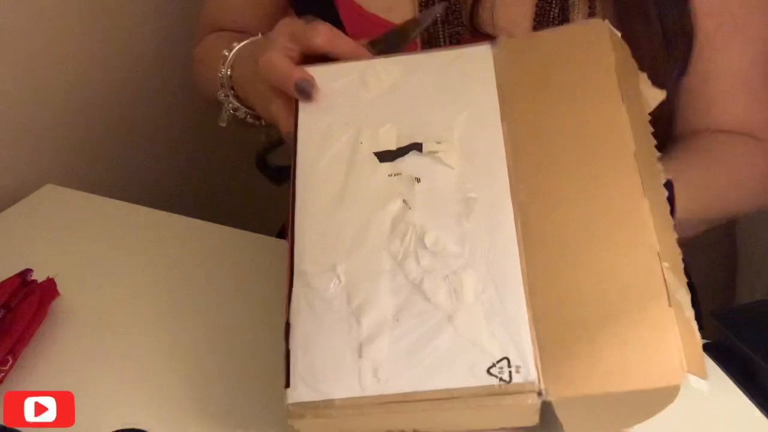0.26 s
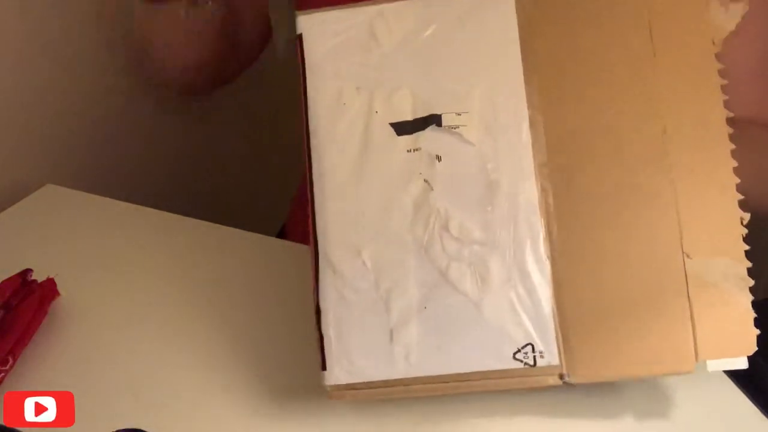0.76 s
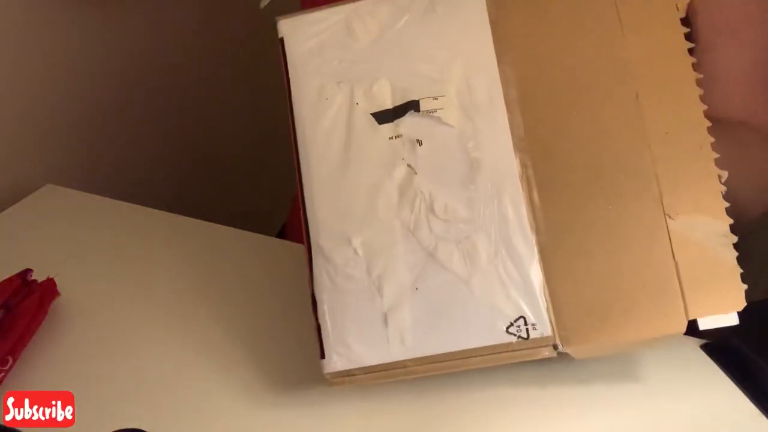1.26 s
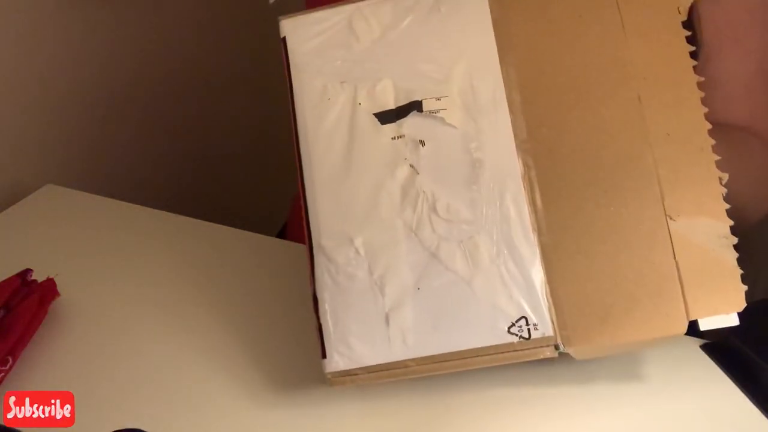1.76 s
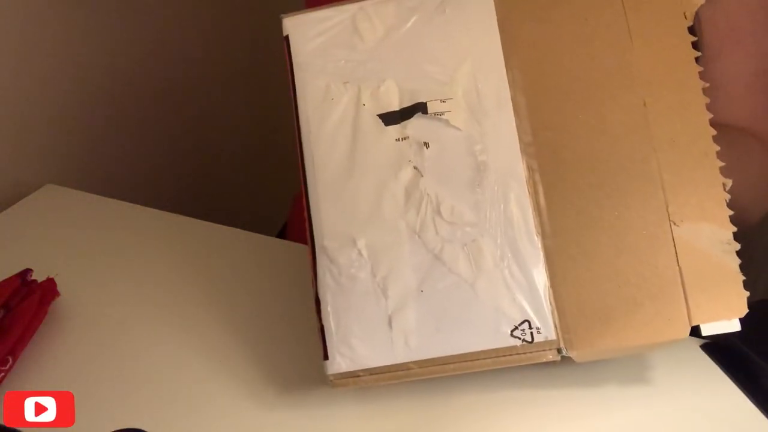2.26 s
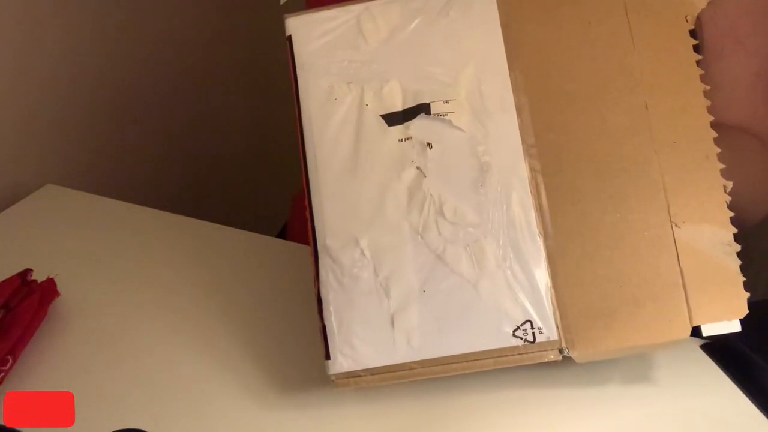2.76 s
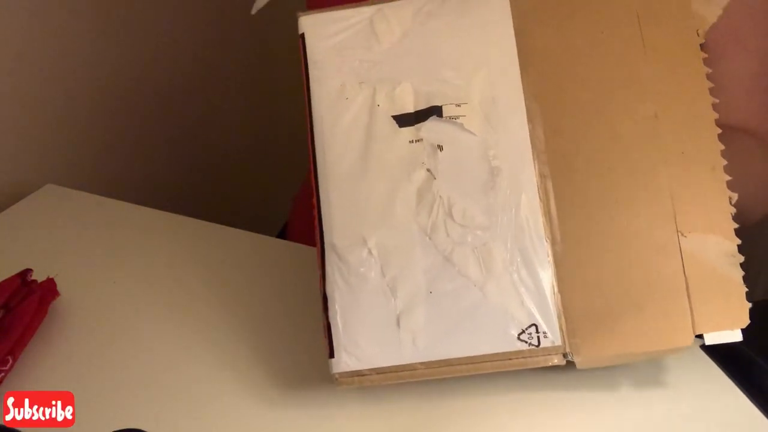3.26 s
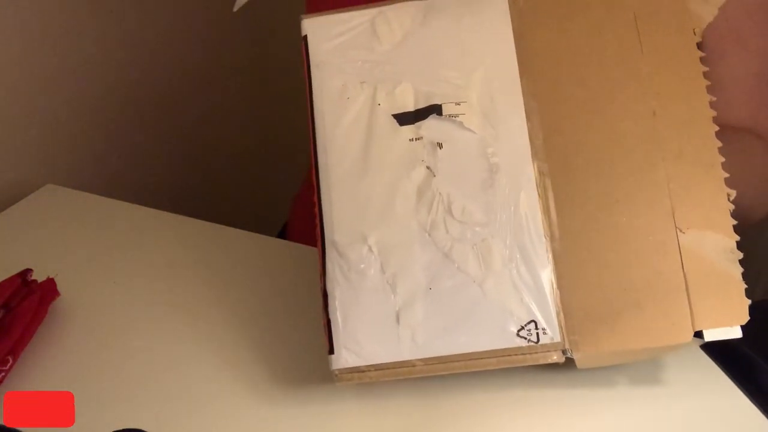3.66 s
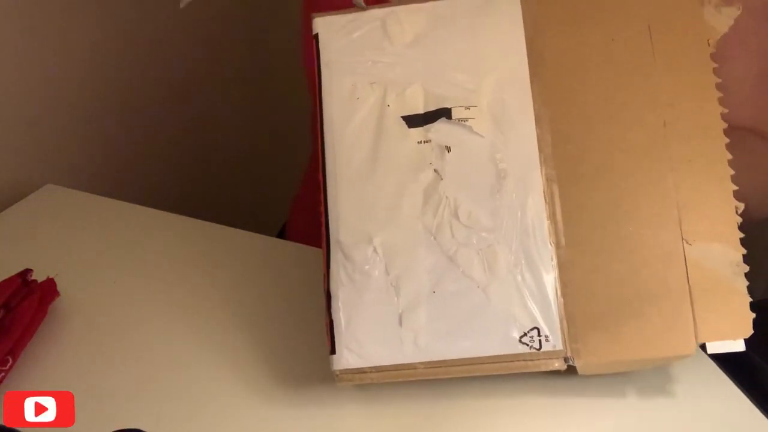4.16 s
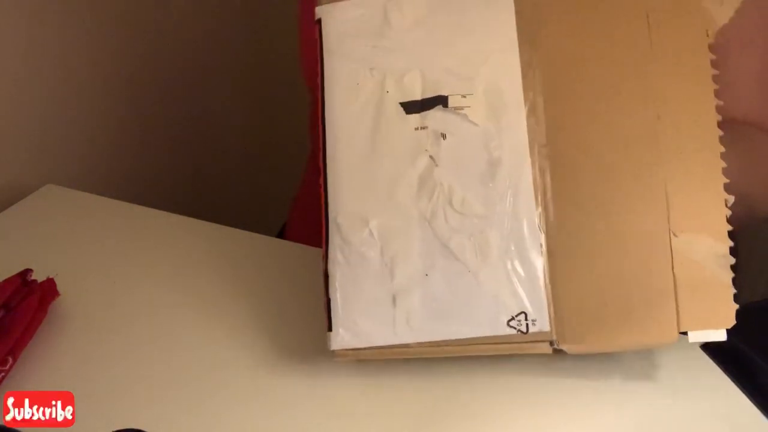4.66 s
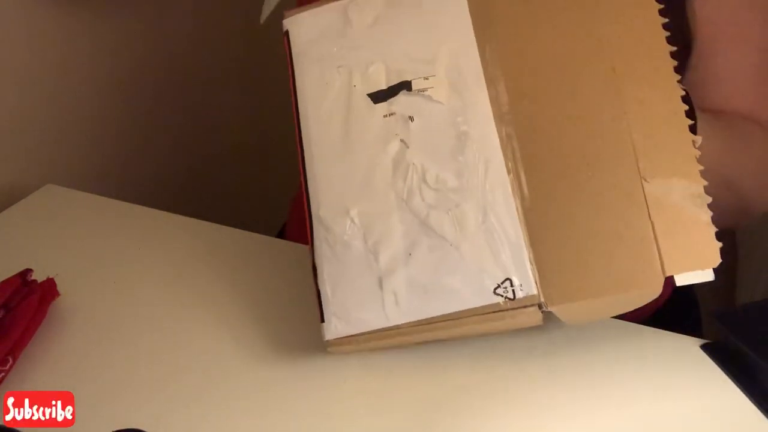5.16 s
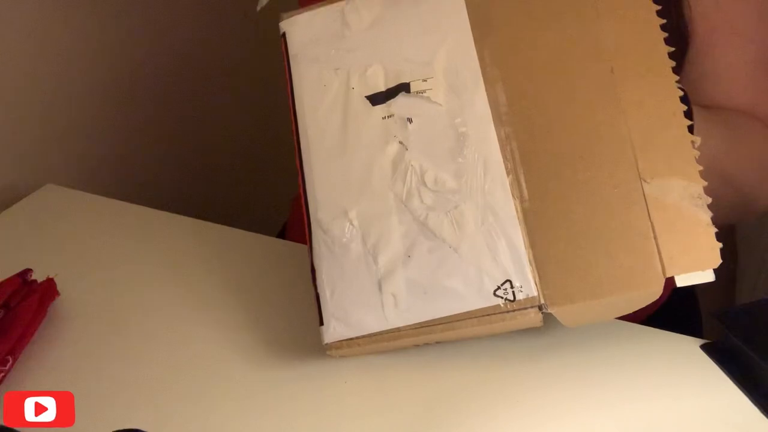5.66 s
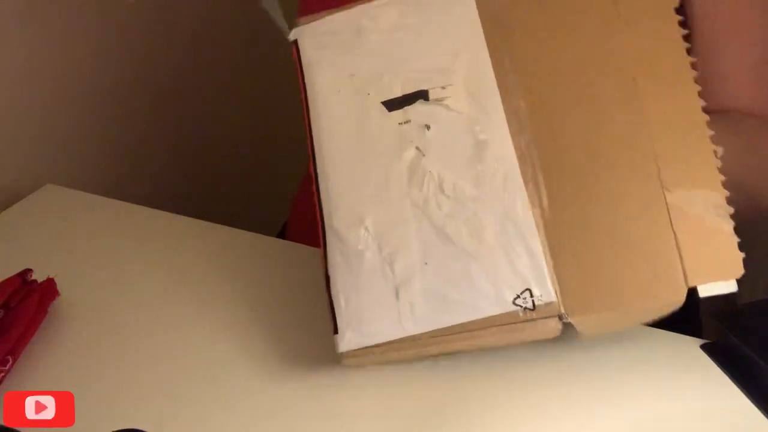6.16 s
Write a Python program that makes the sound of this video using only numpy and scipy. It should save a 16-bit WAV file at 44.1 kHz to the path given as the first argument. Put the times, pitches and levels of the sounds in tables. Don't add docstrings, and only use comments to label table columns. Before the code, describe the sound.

Close phone pickup in a small, lightly reverberant room with faint rumble. Light cardboard handling fades into quiet, then ripping bursts suddenly with bassy flexing, boxy thuds and crisp snapping fibres, ending in a hard triple crack. Bright plastic film crackles, stiff board creaks in rapid clicks, and after a pause another heavy tear jolts the hollow side wall before dying away.

```python
import sys
import numpy as np
from scipy import signal
from scipy.fft import rfft, irfft
from scipy.io import wavfile
from scipy.ndimage import uniform_filter1d

SR = 44100
rng = np.random.default_rng(int(sys.argv[2]) if len(sys.argv) > 2 else 0)


def store_wav(level_fs):
    pcm = np.round(np.clip(np.atleast_2d(level_fs), -1, 1) * 32767)
    wavfile.write(sys.argv[1], SR, pcm.T.astype(np.int16))


def volts(x):
    e = np.asarray(x, float) / 20
    return 10 ** e


N = 281952
T = np.arange(N) / SR
SLOW_T = T[::32]
TURNED_S, CORNER_S = 1.4, 5.4


def curve(table):
    s, *columns = np.transpose(table)
    return [np.interp(T, s, c) for c in columns]


def unit(x):
    return x / np.sqrt(np.mean(x ** 2))


def ring(x, modes):
    out = 0
    for k, (hz, width, db) in enumerate(modes):
        r, w = np.exp(-np.pi * width / SR), 2 * np.pi * hz / SR
        mode = signal.lfilter([0, np.sin(w)], [1, -2 * r * np.cos(w), r * r], x)
        out = out + (-1) ** k * volts(db) * mode
    return out


def colour(x, points):
    hz, db = np.transpose(points)
    f = np.maximum(np.fft.rfftfreq(x.shape[-1], 1 / SR), 1)
    gain = volts(np.interp(np.log(f), np.log(hz), db))
    return irfft(rfft(x) * gain, x.shape[-1])


def walk(rate):
    k = int(SR / rate)
    held = np.repeat(rng.standard_normal(N // k + 1), k)
    return unit(uniform_filter1d(held, k)[:N])


def grains(rate, spread_db, tail_ms):
    sizes = volts(spread_db * np.minimum(rng.exponential(1, N), 3))
    starts = (rng.random(N) < rate / SR) * sizes
    power = signal.lfilter([1], [1, -np.exp(-2000 / (tail_ms * SR))], starts ** 2)
    return unit(np.sqrt(power) * rng.standard_normal(N))


def kicks(s, db):
    x = np.zeros(N)
    np.add.at(x, np.clip((s * SR).astype(int), 0, N - 1), volts(db))
    return x


def push(x, ms):
    w = np.hanning(int(ms * SR / 1000) + 3)
    return np.convolve(x, w / w.sum())[:N]


def climb(ms):
    return 20 * 1000 / np.maximum(ms, 5)


def swells(s, db, rise_db_s, fall_db_s):
    late = SLOW_T - s[:, None]
    slope_db = np.minimum(late * np.reshape(rise_db_s, (-1, 1)), -late * fall_db_s)
    return volts(2 * (db[:, None] + slope_db))


def summed(power, rest_db):
    return 10 * np.log10(np.interp(T, SLOW_T, power.sum(axis=0)) + volts(2 * rest_db))


def drift(x, modes, share, rate, flicker_db):
    out = 0
    for k, mode in enumerate(modes):
        strength = (-1) ** k * volts(flicker_db * walk(rate))
        wandering_time = T + share / rate * walk(rate)
        out = out + strength * np.interp(wandering_time, T, ring(x, [mode]))
    return unit(out)


def echo(x, t60_s, points, channels):
    t = np.arange(SR // 2) / SR
    tail = rng.standard_normal((channels, len(t))) * np.exp(-np.log(1000) * t / t60_s) * (t > .001)
    tail = colour(tail / np.sqrt(np.sum(tail ** 2) / channels), points)
    return signal.fftconvolve(x[None], tail, axes=1)[:, :N]


# (frequency [Hz], density [dB per Hz])
HUSH_SPECTRUM = [(15, -26.5), (25, -22), (53, 4.5), (118, -6.5), (150, -2), (202, -12.5), (483, -21.5),
                 (669, -19.5), (1150, -23.5), (1700, -35.5), (3600, -41), (5720, -46), (7710, -38.5),
                 (16500, -34)]


def hush():
    return volts(-68 + 0.81 * walk(2.2)) * unit(colour(rng.standard_normal(N), HUSH_SPECTRUM))


# (time [s], panel sway [dB], hand pressure [dB], fibre strain [dB])
GRIP = [(0, -55, -50, -46), (.34, -61, -48.5, -61), (.55, -63.5, -52.5, -56), (.95, -68, -55.5, -73),
        (1.27, -53, -56.5, -85), (1.41, -81, -78.5, -85.5), (1.97, -69, -76, -90), (2.04, -69, -64, -86.5),
        (2.42, -80.5, -86, -92), (2.63, -63.5, -54, -84), (2.9, -65.5, -63, -92), (3.08, -67.5, -63, -90),
        (3.4, -68, -74, -87), (4.66, -52.5, -52, -61.5), (5.05, -56.5, -49, -75.5),
        (5.12, -66.5, -63.5, -86.5), (5.39, -77.5, -80.5, -82), (5.5, -53, -53, -70.5),
        (6.39, -75, -62, -73.5)]


def rumble():
    shake = unit(colour(rng.standard_normal(N), [(12, -21), (30, 7.0), (50, 7.5), (90, -37)]))
    return volts(curve(GRIP)[0] + 2.0 * walk(11)) * (T < TURNED_S) * shake


# (time [s], build-up [ms per 20 dB], level [dB])
CRINKLES = [
    (4.6, 151, -59),
    (4.68, 80, -63),
    (4.76, 83, -69.5),
    (4.87, 80, -71),
    (4.96, 80, -72.5),
]
# (time [s],
# level [dB])
POPS = [(1.296, -63), (1.5305, -62), (3.1143, -54), (3.1273, -46), (3.3398, -52), (4.5805, -42),
        (4.634, -43), (4.644, -40), (4.6534, -54), (4.6658, -36), (4.6846, -40), (4.7331, -53),
        (4.7404, -50), (4.7551, -45), (4.784, -49.5), (4.806, -49), (4.8584, -51), (4.8693, -50),
        (4.9247, -54.5), (4.9374, -63), (4.9688, -54), (5.5902, -47), (5.7167, -36), (5.7879, -34),
        (5.8142, -24), (5.876, -40)]
# (frequency [Hz], density [dB per Hz])
FILM_SPECTRUM = [(9000, -27.5), (12000, -5), (14500, -1.5), (16000, -9.5)]


def film():
    s, ms, db = np.transpose(CRINKLES)
    level_db = summed(swells(s, db, climb(ms), fall_db_s=148), -110)
    crinkle = unit(colour(grains(400, 4.0, 1.5), FILM_SPECTRUM))
    pop_ms = 1.2
    decay = signal.lfilter([1], [1, -np.exp(-1000 / (pop_ms * SR))], kicks(*np.transpose(POPS)))
    pops = decay * rng.standard_normal(N)
    return volts(level_db) * crinkle + volts(10.5) * colour(pops, FILM_SPECTRUM)


# (frequency [Hz], width [Hz], level [dB])
PING_MODE = [(11850, 26, 0)]


def ping():
    return ring(kicks(np.array([3]), -45), PING_MODE)


# (time [s], level [dB], hollow [dB])
SLIPS = [(4.749, -48, -21), (4.776, -37.5, -8.5), (4.798, -35.5, -6.5), (4.82, -39, -3.5),
         (4.839, -33, -6.5), (4.859, -30.5, -7.5), (4.878, -30, -5.5), (4.905, -29.5, -11),
         (4.95, -28.5, -6.5), (4.975, -29.5, -6.5), (5.008, -31, -4), (5.031, -32, -5)]
# (frequency [Hz], width [Hz], level [dB])
FOLD = [(593, 240, -1.5), (728, 84, -2.5), (920, 117, 4.5), (1170, 215, 7.5), (1610, 52, -8),
        (1820, 170, -4), (2700, 890, 5), (3150, 960, 4.5), (4630, 260, -15)]
HOLLOW = [(404, 46, 1.5), (334, 100, -6.5), (512, 52, -5)]


def creak():
    s, db, hollow_db = np.transpose(SLIPS)
    click = ring(kicks(s, db - 8.5), FOLD)
    return click + ring(push(kicks(s + 0.00352, db + hollow_db + 8.0), 2.26), HOLLOW)


# (frequency [Hz], width [Hz], level [dB])
FLAP_MODES = [(3135, 248, 6.5), (3650, 310, -5)]


def flap():
    return ring(kicks(np.array([6.1965]), -33), FLAP_MODES)


# (time [s], level [dB], overtone [dB])
JERKS = [(3.164, -23, -10.5), (3.21, -27, -18), (3.68, -33, -21), (4.243, -31, -0.5), (4.262, -27.5, 0.5),
         (4.287, -25.5, 0.5), (4.31, -30, -2), (3.812, -42, -9), (3.866, -26.5, -13), (3.897, -28, -8.5),
         (5.832, -27, -3), (5.99, -28, -2.5), (6.034, -18.5, -12), (6.064, -17, -1), (6.1, -23, -6),
         (6.125, -31, -6)]
# (frequency [Hz], width [Hz], level [dB])
SIDE_WALL = [(408.5, 22, 0.0036)]
SIDE_OVERTONE = [(817, 28, 0.0031)]


def side_wall():
    s, db, overtone_db = np.transpose(JERKS)
    return ring(push(kicks(s, db), 1.0), SIDE_WALL) + ring(kicks(s, db + overtone_db), SIDE_OVERTONE)


# (time [s], level [dB], upper modes [dB])
JOLTS = [(0.012, -14, -5.5), (0.025, -35, -4), (0.157, -35, 5.5), (0.214, -33.5, -10), (0.281, -34.5, -8),
         (0.619, -41, 6.5), (0.818, -30, -10), (1.085, -38, -1.5), (1.097, -31.5, -28), (1.242, -37, -16),
         (2.017, -36, -20), (2.051, -48.5, -13), (2.611, -44.5, -6), (2.818, -58, -4), (2.897, -56, -18),
         (2.925, -50, -14), (2.953, -55, -12), (2.983, -44, -19), (3.024, -54, -3), (3.087, -47, -11),
         (3.166, -10.5, -12.5), (3.217, -22, -44), (3.447, -22, -15), (3.608, -30, -23), (3.657, -25, -13),
         (3.679, -20.5, -36), (3.727, -28, -32), (3.804, -25.5, -30), (3.842, -15.5, -42.5),
         (3.895, -20.5, -19.5), (4.032, -23, -37), (4.072, -23, -23.5), (4.244, -26.5, -9.5),
         (4.258, -27, -7), (4.272, -19.5, -12.5), (4.296, -20.5, -13), (4.418, -20.5, -17.5),
         (5.518, -36.5, -15), (5.549, -34.5, -14), (5.597, -18.5, -14), (5.666, -9, -16),
         (5.783, -21.5, -9), (5.809, -15.5, -30), (5.828, -8.5, -20), (5.876, -13, -18),
         (5.909, -15.5, -18), (5.948, -16.5, -22), (6.003, -10, -21), (6.043, -6, -22), (6.066, -15.5, 0.5),
         (5.969, -20, -20)]
# (frequency [Hz], width [Hz], level [dB])
THUD = [(167, 46, -0.35)]
WALLS = [(292.5, 17.4, -4), (342.8, 43, 0), (401, 41, -1), (536, 23, -10), (233, 56, -7)]
UPPER = [(610, 97, -6), (700, 110, -4), (836.4, 81, 3.5), (963, 160, 1.5), (1128, 119, 0.5)]
EDGE = [(1310, 190, -14), (1574, 87, -6.5), (1860, 540, 4), (2134, 190, -7)]
# (frequency [Hz], gain [dB])
WALL_EDGE = [(430, 0), (500, -5), (700, -7)]


def jolts():
    s, db, upper_db = np.transpose(JOLTS)
    knock = push(kicks(s, db - 6.0), 0.94)
    return colour(ring(knock, THUD + WALLS), WALL_EDGE) + ring(kicks(s, db + upper_db - 5.0), UPPER + EDGE)


# (time [s], level [dB])
BREAKS = [
    (0.0105, -19.5),
    (4.4152, -14),
    (4.4164, -17),
    (4.4185, -16.5),
]
# (frequency [Hz], width [Hz], level [dB])
BOARD = [(706, 770, 1.5), (1320, 810, 4.5), (3010, 5300, 0.5), (4510, 1900, -6.5)]


def breaks():
    return ring(kicks(*np.transpose(BREAKS)), BOARD)


# (frequency [Hz], gain [dB])
TURNING = [(1500, 2), (2050, 5), (2500, 1.5), (3100, 0), (3800, -3.5), (5000, -3.5), (6500, -1.5),
           (12000, -5.5)]
CORNER = [(2700, -2), (3900, -2.5), (4700, 2.5), (5500, 2.5), (6300, 1.5), (8500, -2), (12000, 0.5),
          (15000, -1)]


def facing(x):
    turning = colour(x * (T < TURNED_S), TURNING)
    middle = x * (T >= TURNED_S) * (T < CORNER_S)
    return turning + middle + colour(x * (T >= CORNER_S), CORNER)


# (time [s], fine [dB], coarse relative to fine [dB], body relative to fine [dB])
TICKS = [(.1273, -50, -3, 26.5), (.284, -43, -4, 9.5), (.4304, -43, 0.5, -4), (.4758, -38.5, -8, 7),
         (.5397, -39, -6, -15), (.598, -47, 1, -7), (.612, -25, -7, -16), (.8175, -36.5, -5, -2),
         (.8505, -36, -30, -25), (1.0984, -49.5, -4, 11), (1.1904, -54, -4, 3), (1.2294, -44, -23, -9),
         (1.296, -50, -33, -17), (1.3523, -53.5, -34, -22), (1.5297, -53, -28, -12),
         (1.6044, -39.5, -19, -9.5), (1.7283, -30, -30.5, -51), (2.598, -59, -11, 10),
         (3.1268, -55, -21, -16), (3.3562, -45, -45, -26), (4.6344, -35, -13, -4), (4.6658, -41, -19, -18),
         (4.7332, -42, -26, -28), (5.122, -52.5, -27, -28), (5.1427, -47.5, -7.5, -5),
         (5.2205, -54.5, -29.5, -14), (5.2919, -51.5, -12, -2), (5.4271, -50.5, -11, -9.5),
         (5.472, -45.5, -29.5, -4), (5.5902, -32, -11.5, -2.5)]
CRACKS = [(0.0094, -33, 4, 9), (0.0254, -44, -8, -2.5), (0.0711, -33.5, 2.5, -7), (0.9132, -42.5, -18, 9),
          (1.029, -58, -2, -6), (1.07, -57, 0.5, -7), (1.0838, -47.5, 1, -9), (1.1322, -54.5, 0.5, -6),
          (1.1592, -57, 2, -2), (1.241, -49, -5, -7), (3.1436, -29.5, -14.5, -6), (3.1641, -22.5, -5.5, 2),
          (3.2214, -42, -4, -4), (3.3272, -54, -6.5, -4), (3.4105, -58.5, -2, 5.5), (3.5542, -52, -11, -6),
          (3.5776, -60, -12, -9), (3.641, -52, -4, -5), (3.6585, -49, -10, 13), (3.6814, -37, -16, -6),
          (3.7318, -41, -13, -1), (3.7782, -43, -2.5, -5.5), (4.0256, -41, -5, -1), (4.069, -40.5, 3, -4),
          (4.1673, -52, 2, -4.5), (4.291, -31, -9, -6.5), (4.58, -44, -13, 3), (5.5995, -36.5, -3, 3.5),
          (5.622, -43, -3, -6), (5.8274, -21, -6, 12), (5.8424, -24.5, -2.5, 0), (5.9487, -35.5, -0.5, -10),
          (5.9881, -33, 3, -4), (6.0294, -32, -4, -3), (6.0464, -25.5, 1, -6)]
SNAPS = [(3.1524, -15.5, -29, -15), (3.4471, -40.5, -6, -16), (3.4636, -28, -15.5, -7),
         (3.496, -32.5, -6, -4), (3.5982, -35, -11, -15), (3.7972, -39, -1, -6), (3.8043, -30.5, -8, -24),
         (3.8367, -17, -21, -22), (3.8505, -14, -20, -39), (3.8825, -28.5, -0.5, -19),
         (4.0076, -24, -19, -38), (4.0801, -27.5, -7.5, -16), (4.2326, -20.5, -15, -28),
         (4.2419, -17.5, -12, 2.5), (4.2821, -23, -30, 9.5), (4.3016, -20, -25, -23),
         (4.4044, -22, -10, -21), (4.4146, -9.5, -8, -5.5), (5.6376, -29.5, -10, 1), (5.664, -26, -8, 9),
         (5.7174, -25, -7.5, 1.5), (5.7882, -23, -8, -13), (5.8127, -24.5, -1, -15), (5.876, -26.5, -3, -1),
         (5.903, -31, 1, -13), (5.9648, -39, 7, 1), (6.0667, -16.5, -4, 5.5), (6.0726, -11, -30, -14),
         (6.1025, -18, -13, -12), (6.1957, -34.5, 5.5, 0)]
# (frequency [Hz], density [dB per Hz])
COARSE = [(1500, -4.5), (2200, -6.5), (3600, -2.5), (4800, -6), (6000, -18), (7200, -43.5)]
FINE = [(4500, -41), (6200, -6.5), (8200, 1), (10000, -0.5), (12000, -6), (14500, -14.5), (15800, -14.5),
        (16600, -36.5)]


def snaps(table, ms):
    bursts = np.zeros((3, N))
    t = np.arange(SR // 25) / SR
    attack_ms = 0.49
    shape = (1 - np.exp(-t * 1000 / attack_ms)) * np.exp(-t * 1000 / ms) * volts(2.5)
    for s, db, coarse_db, body_db in table:
        i = int(s * SR)
        levels = volts(db + np.array([[0], [coarse_db], [body_db]]))
        bursts[:, i:i + len(t)] += rng.standard_normal(len(t)) * shape * levels
    fine, coarse, body = bursts
    fibres = facing(volts(3.5) * colour(fine, FINE) + volts(13.5) * colour(coarse, COARSE))
    return fibres + volts(-25.0) * ring(body, UPPER + EDGE)


# (time [s], level [dB], pitch [Hz], second mode [dB])
FLEXES = [(0.023, -33.5, 87.83, -5.5), (0.158, -47.5, 80.96, -2), (0.479, -34.5, 82.92, -11),
          (0.508, -41.5, 83.9, -27), (.625, -37, 81.1, -29), (0.651, -46, 83.9, -36),
          (.822, -39.5, 96, -21), (1.274, -49, 92.16, -5.5), (3.171, -17.5, 96, -6),
          (3.193, -18.5, 94.4, -14), (3.216, -30, 93.54, -4.5), (3.458, -31, 97.84, -2.5),
          (3.519, -37, 97.2, -4), (3.655, -29, 97.7, -7.5), (3.692, -33, 98.7, -5.5),
          (3.828, -21.5, 121.9, -12), (3.888, -24, 124.8, -2), (3.929, -35.5, 126.1, 4),
          (4.037, -35.5, 114.6, 1), (4.09, -38, 97.6, -8.5), (4.255, -17.5, 93.3, -3),
          (4.279, -11.5, 92.8, -1), (4.3, -11, 92.85, -11.5), (4.339, -24, 92.5, -20),
          (4.423, -31, 94.6, 2.5), (5.606, -22.5, 105.2, -1.5), (5.629, -40, 100.6, -8),
          (5.668, -18.5, 109.5, -2), (5.69, -25, 94.8, -17), (5.83, -20, 96, 2.5), (5.865, -23.5, 96, -6),
          (5.914, -26.5, 103.3, 5), (5.975, -19, 127.8, 5), (6.002, -24, 130.6, 7), (6.043, -23, 127, 9),
          (6.108, -20.5, 106.1, -4.5)]


def flexing():
    s, db, hz, second_db = np.transpose(FLEXES)
    sway_db = curve(GRIP)[0]
    rise_db_s, rest_hz = 1595.5, 96
    power = swells(s, db, rise_db_s, fall_db_s=229.5)
    level_db = summed(power, sway_db)
    pitch = rest_hz * volts(summed(power * hz[:, None] / rest_hz, sway_db) - level_db) ** 2
    second_power = swells(s, db + second_db, rise_db_s, fall_db_s=269)
    return pitch, level_db, summed(second_power, sway_db - 7.5)


def panel():
    hz, db, second_db = flexing()
    swing = np.sin(2 * np.pi * np.cumsum(hz * (1 + 0.015 * walk(30))) / SR)
    loose = unit(ring(rng.standard_normal(N), [(105.0, 45, -0.47), (149.5, 44, -3.5)]))
    second_hz = 197.4 * (1 + 0.04 * walk(45))
    second = np.sin(2 * np.pi * np.cumsum(second_hz) / SR)
    first = volts(db + .9 * walk(25)) * (1.15 * swing + volts(-5.0) * loose)
    return first + volts(second_db - 0.64 + 1.5 * walk(40)) * second


# (time [s], build-up [ms per 20 dB], hand pressure [dB], fibre strain [dB],
# thick fibres relative to strain [dB])
TUGS = [(0.015, 28, -27, -61, 13), (0.09, 52, -59, -45, 5), (.15, 58, -42, -53, 6),
        (0.619, 23, -42, -44.5, -1), (.84, 158, -46, -55, -5.5), (1.75, 36, -75, -61, -21),
        (3.1, 131, -50, -79.5, -2.5), (3.161, 24, -23, -40, -8.5), (3.214, 45, -36, -64, -19),
        (3.47, 24, -31, -59.5, -1), (3.5, 40, -33.5, -55, -8), (3.682, 137, -32.5, -54.5, -0.5),
        (3.723, 72, -32.5, -58.5, -2.5), (3.807, 36, -29, -51.5, -0.5), (3.861, 62.5, -30, -43.5, -4),
        (3.896, 102, -27.5, -50.5, -3.5), (4.042, 40, -42.5, -51.5, -3.5), (4.088, 70.5, -36, -59, -1.5),
        (4.251, 13.5, -24.5, -37.5, -4.5), (4.289, 62, -21, -38.5, -3.5), (4.35, 81, -46.5, -46.5, -5.5),
        (4.426, 11, -38.5, -40.5, -3.5), (5.601, 11, -30.5, -54, -14), (5.669, 63, -24, -51.5, -3.5),
        (5.82, 62, -32, -43, -2), (5.854, 109, -31.5, -48, 3), (5.965, 56.5, -46, -51.5, 4),
        (6.0, 56, -23.5, -45.5, 4), (6.061, 117, -17.5, -40.5, 2), (6.116, 58, -41, -43.5, -9),
        (6.19, 91, -43.5, -41.5, -8)]


def tugging():
    s, ms, pressure_db, strain_db, thick_db = np.transpose(TUGS)
    _, held_db, tight_db = curve(GRIP)
    rise, strain_fall_db_s = climb(ms), 231
    wall_db = summed(swells(s, pressure_db, rise, fall_db_s=274), held_db)
    fine_db = summed(swells(s, strain_db, rise, strain_fall_db_s), tight_db)
    coarse_db = summed(swells(s, strain_db + thick_db, rise, strain_fall_db_s), tight_db - 1.5)
    scrape_db = 0.56 * wall_db + .46 * coarse_db + 1.5
    return wall_db, scrape_db, coarse_db, fine_db


def rubbing():
    wall_db, scrape_db, coarse_db, fine_db = tugging()
    slip = grains(300, 1.96, 2.9)
    walls = colour(drift(slip, WALLS, 0.02985, 15, 1.5), WALL_EDGE) * volts(wall_db - 3.5)
    rasp = slip + .9 * grains(1100, 3.0, 1.2)
    scrape = drift(rasp, UPPER, 0.03985, 25, 0.8) * volts(scrape_db - 4.5)
    edge_db = scrape_db - 10.0 + 2 + 0.2 * (coarse_db - wall_db + 9.5)
    edge = drift(rasp, EDGE, 0.0397, 30, 1.5) * volts(edge_db)
    crackle = grains(1100, 3.5, 1.2) + .5 * rng.standard_normal(N)
    coarse = unit(colour(crackle, COARSE)) * volts(coarse_db + 0.29 * walk(40) + 4.0)
    fine = unit(colour(crackle, FINE)) * volts(fine_db + 3.23 * walk(40) + 2.5)
    return walls + scrape + edge + facing(coarse + fine)


def room(x):
    tone = [(100, -19.5), (300, -12.0), (800, -8.5), (4000, -3.0), (12000, -13.5)]
    return volts(-9.5) * echo(x, 0.43, tone, channels=1)[0]


# (frequency [Hz], lead [radians])
LEFT_LEAD = [(0, 0), (2300, -.6), (2930, -3.6), (4740, -1.2), (5750, -3.1), (7300, -6.2), (8000, -6.5),
             (9200, -9.3), (9700, -9.6), (11100, -12.5), (11700, -12.7), (12600, -15.6), (13700, -15.8),
             (14400, -18.8)]
# (frequency [Hz], left minus right [dB])
TILT = [(60, 2), (200, -1), (700, 3.5), (2400, 7), (4400, 5), (9000, -0.5)]


def phase_network(x):
    f = np.fft.rfftfreq(N, 1 / SR)
    lead = np.interp(f, *np.transpose(LEFT_LEAD))
    half = np.exp(.5j * lead) * volts(np.interp(f, *np.transpose(TILT)) / 2)
    return irfft(rfft(x) * np.array([half, 1 / half]), N)


# (frequency [Hz], level [dB])
SCATTER = [(120, -20.5), (250, -12.5), (600, -1), (2000, -3.5), (3200, 0.5), (5800, 0.5), (7200, -9),
           (9400, -13), (12000, -8.5)]


def scatter(x, count):
    share = np.array([walk(18) for _ in range(count)])
    share /= np.sqrt(np.sum(share ** 2, axis=0))
    return sum(echo(x * w, 0.036, SCATTER, channels=2) for w in share)


def scene():
    box = film() + ping() + creak() + flap() + side_wall() + jolts() + breaks()
    box = box + snaps(TICKS, ms=2.2) + snaps(CRACKS, ms=1.42) + snaps(SNAPS, ms=1.5)
    box = box + panel() + rubbing()
    box = signal.sosfilt(signal.butter(5, 63, "high", fs=SR, output="sos"), box)
    air = hush() + rumble() + box + room(box)
    direct = colour(air, [(300, 0.63), (800, -1.5), (1800, -2.0), (3000, -9.5), (5000, 1.5), (6800, -1.82)])
    return phase_network(direct) + scatter(air, count=7)


def top_cut(x):
    return signal.sosfilt(signal.butter(12, 16670, fs=SR, output="sos"), x)


def record(dry):
    rounded = np.tanh(0.3 * dry) / 0.3
    mix = signal.sosfilt(signal.butter(2, 36, "high", fs=SR, output="sos"), rounded)
    mix = signal.sosfilt(signal.butter(12, 15600, fs=SR, output="sos"), mix)
    return top_cut(mix)


dry = scene()
out = record(dry)
store_wav(out)
```